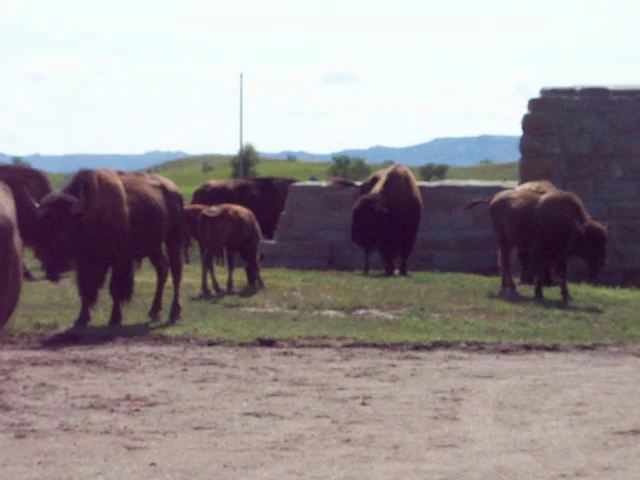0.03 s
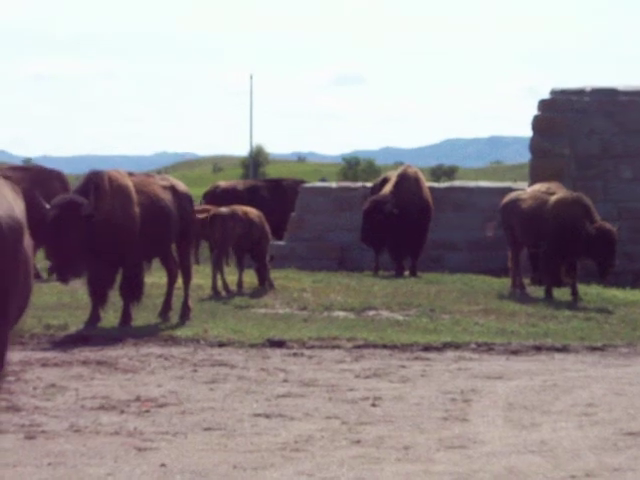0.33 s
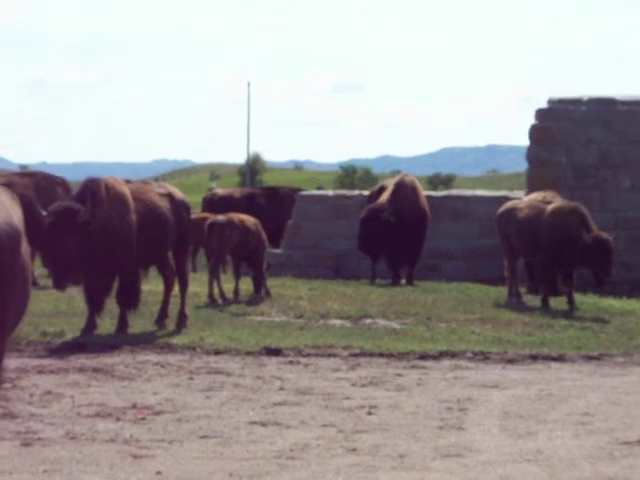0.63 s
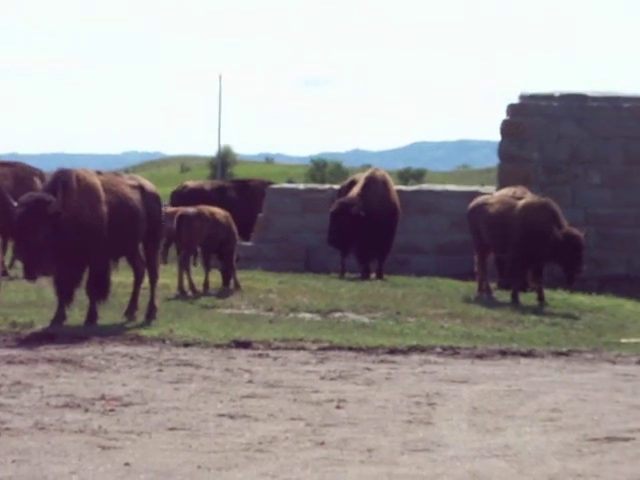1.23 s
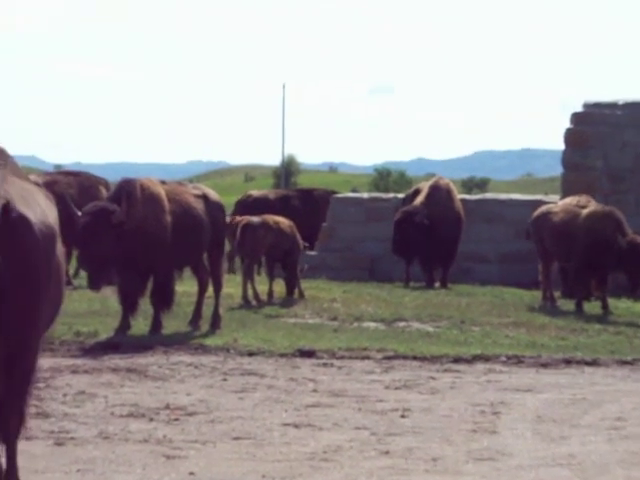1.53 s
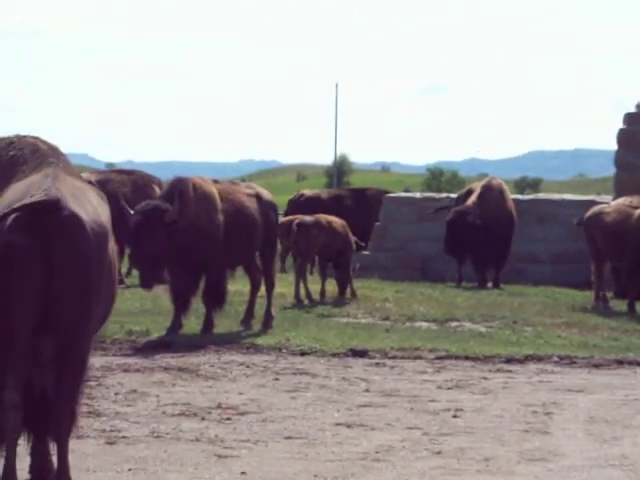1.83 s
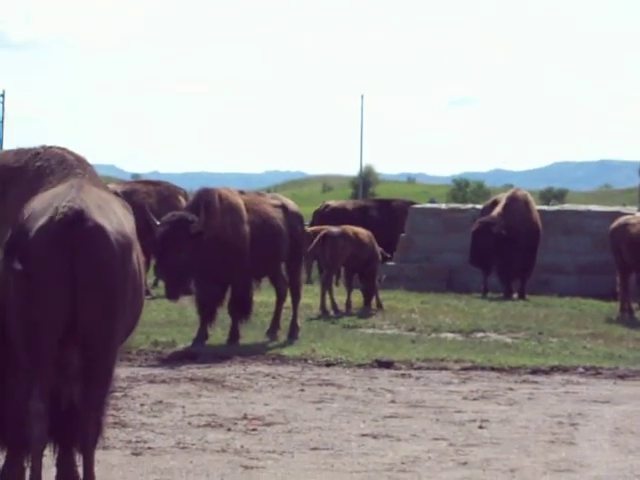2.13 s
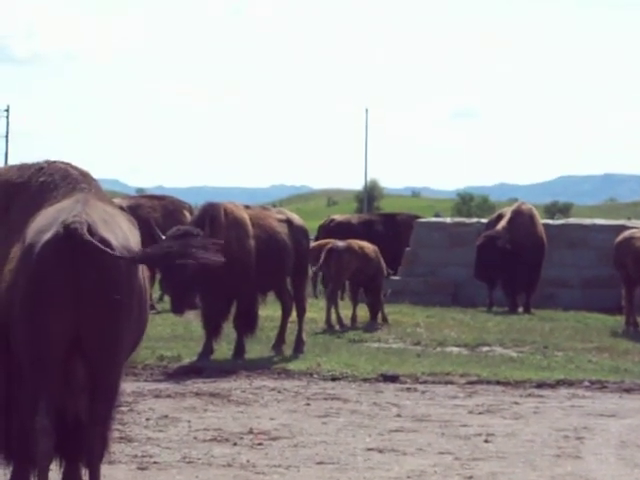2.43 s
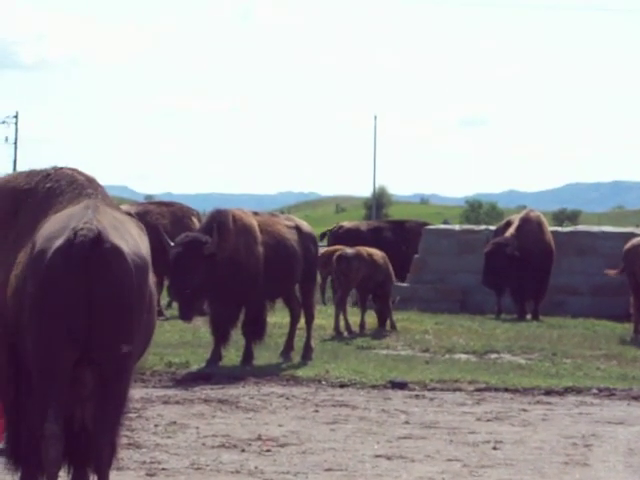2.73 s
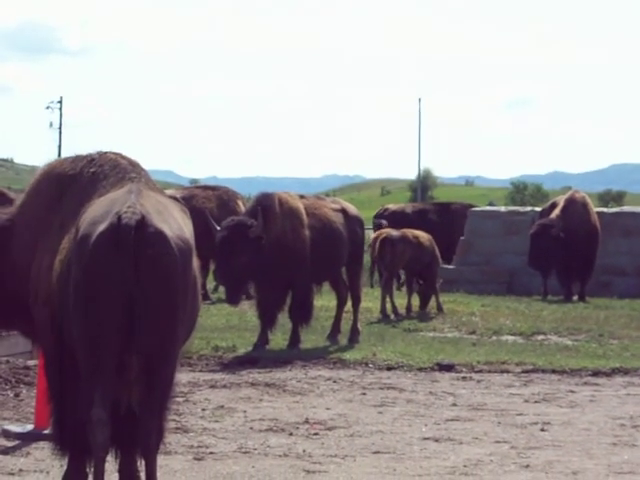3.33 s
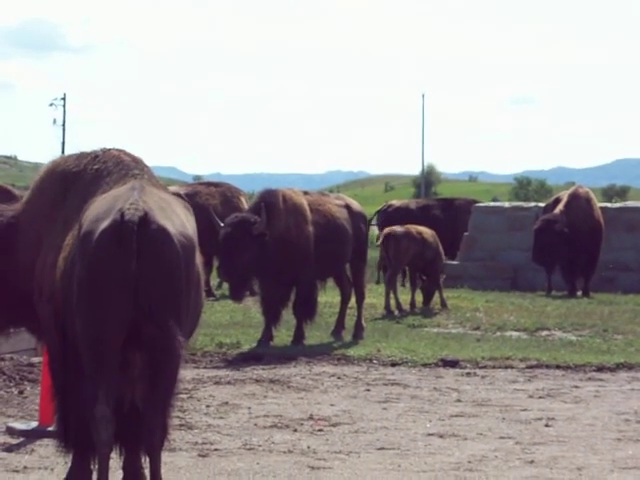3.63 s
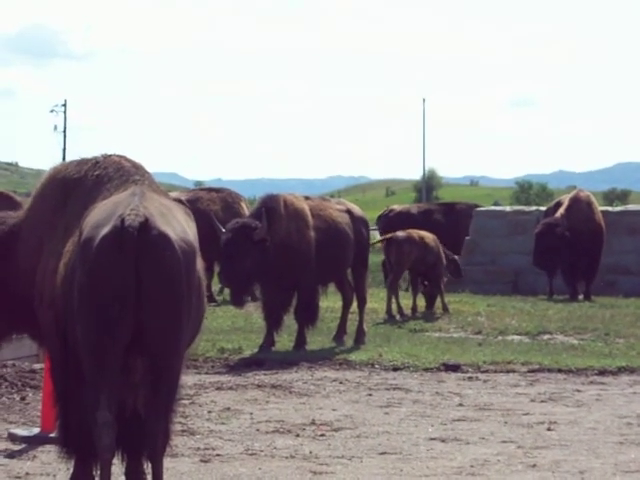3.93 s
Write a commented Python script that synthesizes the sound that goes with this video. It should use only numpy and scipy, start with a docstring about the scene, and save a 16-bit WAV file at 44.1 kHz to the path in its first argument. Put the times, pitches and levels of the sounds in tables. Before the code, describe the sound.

A bison gives two low, rattling grunts outdoors over softly idling engines.

```python
"""A bison grunts twice in an open yard, and each low grunt sinks into a rattle.
Its vocal folds flap slowly. Each flap rings the throat, chest and nose, slaps the higher tones
of the mouth and chops the air rushing through the muzzle. Behind it engines idle, a few dry
ticks sound, wind brushes the microphone, and the camera adds hiss and a thin whine."""
import sys
import numpy as np
from scipy import signal
from scipy.fft import rfft, irfft
from scipy.io import wavfile
from scipy.ndimage import uniform_filter1d

SR = 44100
rng = np.random.default_rng(int(sys.argv[2]) if len(sys.argv) > 2 else 0)


def transcribe(signal):
    """Save signal, clipped to [-1, 1], as a 16-bit WAV file at the path in sys.argv[1]."""
    frames = np.atleast_2d(signal).T
    limited = np.clip(frames, -1, 1)
    pcm = np.round(limited * 32767).astype(np.int16)
    wavfile.write(sys.argv[1], SR, pcm)


N = 176400
TIME = np.arange(N) / SR


def from_db(db):
    """Turn decibels into a number to multiply by."""
    return 10 ** (np.asarray(db) / 20)


def unit_power(x):
    """Scale a sound so its average power is 1."""
    return x / np.sqrt(np.mean(x ** 2) + 1e-20)


def in_time(rows):
    """Join a table's points into curves, one for each column after the time."""
    times, *columns = np.transpose(rows)
    return [np.interp(TIME, times, column) for column in columns]


def cut(x, hz, kind="low", order=2):
    """Keep the low (or high) side of hz; a higher order cuts more sharply."""
    return signal.sosfilt(signal.butter(order, hz, kind, fs=SR, output="sos"), x + 1e-18)


def resonate(x, hz, width_hz):
    """Ring at one pitch; a narrower width rings longer."""
    r = np.exp(-np.pi * width_hz / SR)
    feedback = [1, -2 * r * np.cos(2 * np.pi * hz / SR), r * r]
    return signal.lfilter(np.array([1, 0, -1]) * (1 - r * r) / 2, feedback, x + 1e-18)


def cavity(x, tones):
    """A hollow space rings at several pitches, added with alternating signs."""
    return sum((-1) ** k * from_db(db) * resonate(x, hz, width)
               for k, (hz, width, db) in enumerate(tones))


def even(x, size=2600):
    """Even out the loudness, holding the short-term power near 1."""
    power = uniform_filter1d(uniform_filter1d(x ** 2, size), size // 2)
    return x / np.sqrt(np.abs(power) + 1e-4 * np.mean(x ** 2))


def noise(colour):
    """Noise shaped by (pitch_hz, level_db) points, falling away beyond both ends."""
    hz, db = np.transpose(colour)
    freqs = np.maximum(np.arange(N // 2 + 1) * SR / N, 1)
    edges = np.minimum(freqs / hz[0], 1) ** 2 * np.minimum(hz[-1] / freqs, 1) ** 4
    shape = from_db(np.interp(np.log(freqs), np.log(hz), db))
    return unit_power(irfft(rfft(rng.standard_normal(N)) * edges * shape, N))


def drift(rate_hz):
    """A smooth random wobble, mostly slower than rate_hz."""
    freqs = np.arange(N // 2 + 1) * SR / N
    return unit_power(irfft(rfft(rng.standard_normal(N)) / (1 + (freqs / rate_hz) ** 2), N))


def burst(start_s, decay_s):
    """A puff of noise that starts at once and dies away."""
    return rng.standard_normal(N) * (TIME >= start_s) * np.exp(-np.abs(TIME - start_s) / decay_s)


def camera():
    """Steady hiss and a thin, beating whine that wavers in level."""
    # tone of the hiss: pitch_hz, level_db
    hiss_colour = [(1000, 8.5), (4000, -8.5), (5500, -2.5), (7300, 5.5), (8200, 0), (9000, -30)]
    whine_hz, beat_hz = 8000, 19.7
    whine = 2 * from_db(-74 + 2 * drift(1.1)) * np.sin(2 * np.pi * whine_hz * TIME)
    return from_db(-67.5) * noise(hiss_colour) + whine * np.sin(np.pi * beat_hz * TIME)


def yard():
    """The broad, slightly fluttering noise of the engines and the yard."""
    # tone of the noise: pitch_hz, level_db
    colour = [(150, 0.5), (310, -6.5), (900, -9), (1220, -12.5), (1680, -26.5), (2700, -28.5), (4000, -39)]
    # its slow swell: time_s, level_db
    swell = [(1.15, -50), (1.5, -47.5), (2, -46.5), (4, -53.5)]
    return from_db(in_time(swell)[0] + 1.4 * drift(18)) * noise(colour)


def wind():
    """Gusts brush the microphone and make a low rumble."""
    # tone of the rumble: pitch_hz, level_db
    colour = [(20, -10.5), (42, -4.5), (85, -12), (130, -12.5)]
    # strength of the gusts: time_s, level_db
    gusts = [(.8, -42.5), (1.07, -37), (1.17, -51), (2.2, -41), (3.07, -34.5), (3.22, -49)]
    return from_db(in_time(gusts)[0]) * even(noise(colour), size=6000)


def engine(running, tones):
    """A muffled idle hums at multiples of a wandering firing rate."""
    hz, db = in_time(running)
    phase = 2 * np.pi * np.cumsum(hz * (1 + 0.01233 * drift(6.2))) / SR
    hum = np.zeros(N)
    for multiple, gain_db in tones:
        loudness = from_db(db + gain_db + 3.5 * drift(21))
        hum += loudness * np.sin(multiple * phase + 2 * np.pi * rng.random())
    return np.sqrt(2) * hum


def engines():
    """Two engines idle nearby, one firing faster than the other."""
    # how each one runs: time_s, firing_hz, level_db
    faster = [(1, 77.3, -44), (1.5, 72.4, -36.5), (4, 72, -39.5)]
    slower = [(.25, 58.85, -43), (3.3, 61.04, -46), (4, 61, -48)]
    # the tones in each hum: multiple, gain_db
    faster_tones = [(1, -3.5), (3, -18.5), (6, -26)]
    slower_tones = [(1, -8), (2, -2.5), (4, -17), (6, -18)]
    return engine(faster, faster_tones) + engine(slower, slower_tones)


def ticks():
    """Small dry ticks and scuffs, each a puff of noise around one pitch."""
    # one tick a row: start_s, peak_db, pitch_hz, width_hz, decay_s
    events = [(0.274, -39.5, 6950, 790, 0.0016), (1.045, -46.5, 2860, 450, 0.019),
              (1.45, -36.5, 950, 600, 0.0027), (1.611, -43, 930, 710, 0.003)]
    out = np.zeros(N)
    for start_s, db, hz, width_hz, decay_s in events:
        ring = cut(resonate(burst(start_s, decay_s), hz, width_hz), 1.26 * hz, order=4)
        out += from_db(db) * ring / np.abs(ring).max()
    return out


def throat_catches():
    """Single hard slaps of the vocal folds, each with a wet tail, ring one tone of the mouth."""
    # one catch a row: start_s, relative_db, pitch_hz
    events = [(.294, -37.5, 1180), (.972, -38, 1250), (2.141, -34.5, 933), (2.184, -32, 880),
              (2.232, -34, 850), (2.663, -36, 1210), (2.706, -35, 1000)]
    out = np.zeros(N)
    for start_s, db, hz in events:
        slap = signal.unit_impulse(N, int(start_s * SR)) + .06 * burst(start_s, decay_s=.006)
        ring = cut(resonate(slap, hz, width_hz=150), 1.57 * hz, order=4)
        out += from_db(db + 2) * ring / np.abs(ring).max()
    return out


def flaps(pitch):
    """One click per flap of the vocal folds; slow flaps are more uneven in timing and strength."""
    steady_hz, jitter, shimmer_db = 55.5, .15, 5
    hz, = in_time(pitch)
    roughness = np.minimum(.06 + .028 * np.maximum(steady_hz - hz, 0), .6)
    cycles = np.cumsum(hz) / SR
    cycles -= np.interp(pitch[0][0], TIME, cycles)  # count from the first pitch point
    at = np.flatnonzero(np.diff(np.floor(cycles)))  # the sample where each cycle ends
    timing, strength = rng.standard_normal((1000, 2))[:len(at)].T
    late = jitter * roughness[at] * timing * SR / hz[at]
    clicks = np.zeros(N)
    clicks[np.clip(at + late.astype(int), 0, N - 1)] = from_db(shimmer_db * roughness[at] * strength)
    return clicks


def grunt(pitch, mouth, levels, shut_s):
    """The flaps ring throat, chest and nose, slap the mouth's tones and chop the airflow."""
    # ringing tones of nose and muzzle: pitch_hz, width_hz, gain_db
    nose_tones = [(354, 58, -2.5), (438, 42, 0), (534, 16, 3.5)]
    muzzle_tones = [(1301, 40, 2.5), (1480, 150, 0.5), (1850, 41, 0), (2162, 120, -7), (2498, 58, -6),
                    (2858, 100, -5)]
    # tone of each flap's hiss: pitch_hz, level_db
    spray_colour = [(2500, -4.5), (4000, 2.5), (6500, 5), (8500, -15.5)]
    flap_decay_s, shutting_s, fade_s = 0.0034, .08, .03
    boom_db, chest_db, slap_db, air_db, nose_db = (in_time(rows)[0] for rows in levels)
    clicks = flaps(pitch)
    # each flap opens a gap for air, which quickly closes again
    opening = signal.lfilter([1], [1, -np.exp(-1 / (flap_decay_s * SR))], clicks + 1e-18)

    boom = from_db(boom_db) * even(cut(resonate(clicks, hz=229, width_hz=29), 258, order=8))
    chest = from_db(chest_db - .5) * even(cut(resonate(clicks, hz=142.6, width_hz=20), 349, order=4))
    throb = from_db(chest_db - 15) * even(cut(cut(clicks, 61), 30.4, "high"))  # bare air pulses

    shut = np.clip((TIME - shut_s) / shutting_s + .5, 0, 1)  # mouth: 0 is open, 1 is half shut
    mouth_tones = [(hz, width, open_db + shut * (shut_db - open_db))
                   for hz, width, open_db, shut_db in mouth]
    slaps = clicks + .12 * opening * rng.standard_normal(N)
    slap = from_db(slap_db - .5) * even(cut(cavity(slaps, mouth_tones), 1510, order=4))
    nose = from_db(nose_db) * even(cut(cavity(slaps, nose_tones), 597, order=6))

    airflow = .48 + opening  # steady breath plus a puff per flap
    rush = cavity(airflow * rng.standard_normal(N), muzzle_tones)
    air = from_db(air_db - .5) * even(cut(rush, 3670, order=4))
    spray = from_db(boom_db - 38) * even(airflow * noise(spray_colour))

    start_s, end_s = levels[0][0][0], levels[0][-1][0]  # the boom's first and last points
    fade = np.clip(np.minimum(TIME - start_s, end_s - TIME) / fade_s + 1, 0, 1)
    return fade * (boom + chest + throb + slap + nose + air + spray)


def first_grunt():
    """The softer grunt holds its pitch, then the flaps slow to a rattle."""
    # how fast the folds flap: time_s, rate_hz
    pitch = [(.293, 55.94), (.46, 58.9), (.61, 58.57), (.68, 55.02), (.71, 43.64), (1.12, 43.02)]
    # ringing tones of the mouth: pitch_hz, width_hz, open_db, half_shut_db
    mouth = [(770, 110, -6, -3.5), (972, 56, 5.5, 4), (1275, 44, 6, 1.5)]
    # throat boom, chest ring, mouth slap, muzzle air and nose ring: time_s, relative_db
    boom = [(0.261, -42.5), (.34, -34.5), (0.571, -32), (0.643, -26), (0.707, -35), (0.823, -31),
            (0.859, -43), (0.929, -32.5), (1.181, -55.5)]
    chest = [(.24, -59), (0.829, -44.5), (1.201, -51)]
    slap = [(.26, -56), (.55, -48), (.7, -57), (1, -57.5), (1.2, -75)]
    air = [(0.239, -64), (0.899, -62.5), (0.999, -58.5), (1.15, -69)]
    nose = [(.28, -53.5), (.9, -57), (1, -54), (1.1, -68)]
    return grunt(pitch, mouth, (boom, chest, slap, air, nose), shut_s=0.93)


def second_grunt():
    """The louder grunt starts higher and slides down to an even slower rattle."""
    # how fast the folds flap: time_s, rate_hz
    pitch = [(2.113, 75.19), (2.19, 63.92), (2.25, 59.67), (2.35, 50.28), (2.41, 46.05), (2.9, 45.8),
             (3.07, 33.83)]
    # ringing tones of the mouth: pitch_hz, width_hz, open_db, half_shut_db
    mouth = [(721.5, 20, 2.5, 2), (833, 51, -8, -6), (960, 44, 3, -2), (1249, 21, -10, 0.5)]
    # throat boom, chest ring, mouth slap, muzzle air and nose ring: time_s, relative_db
    boom = [(2.019, -42.5), (2.118, -26.5), (2.19, -34.5), (2.24, -24), (2.304, -23.5), (2.339, -30.5),
            (2.485, -29.5), (2.532, -36.5), (2.601, -29.5), (2.646, -38.5), (2.672, -27.5), (2.807, -27.5),
            (2.845, -37.5), (2.905, -28.5), (3.14, -43.5)]
    chest = [(2, -46), (2.2, -38), (2.29, -33), (2.59, -32.5), (2.635, -36.5), (2.69, -35.5), (2.92, -36.5),
             (3.2, -58)]
    slap = [(2.11, -53), (2.15, -44.5), (2.24, -39), (2.33, -45.5), (2.42, -44), (2.5, -51.5),
            (2.69, -51.5), (3, -53.5), (3.2, -82)]
    air = [(2, -61), (2.41, -52), (2.68, -53), (3, -54.5), (3.2, -63.5)]
    nose = [(2.12, -55.5), (2.3, -45.5), (2.62, -54.5), (2.69, -47.5), (3.03, -48.5), (3.15, -64)]
    return grunt(pitch, mouth, (boom, chest, slap, air, nose), shut_s=2.31)


def scene():
    """The bison in front of the yard's background, in one channel."""
    bison = first_grunt() + second_grunt() + throat_catches()
    return (bison + ticks() + engines() + yard() + wind() + camera())[None]


def record(dry):
    """The sound switches on after a moment, and the highest treble is cut steeply."""
    start_s, cutoff_hz = .233, 8750
    treble_cut = signal.ellip(10, .1, 80, cutoff_hz, fs=SR, output="sos")
    return signal.sosfilt(treble_cut, dry * (TIME >= start_s))


dry = scene()
out = record(dry)
transcribe(out)
```